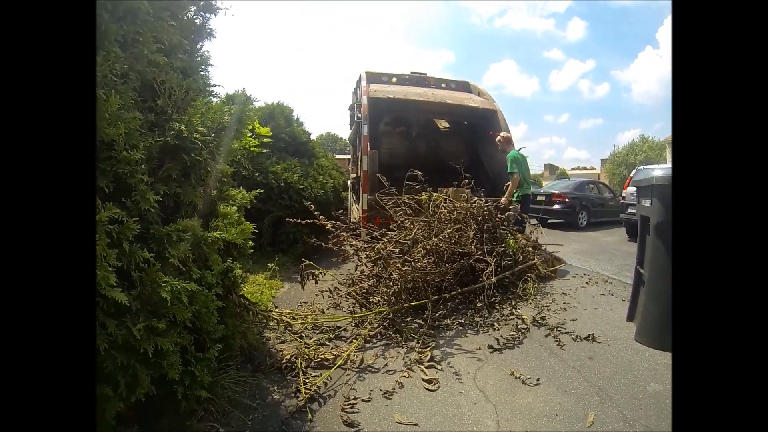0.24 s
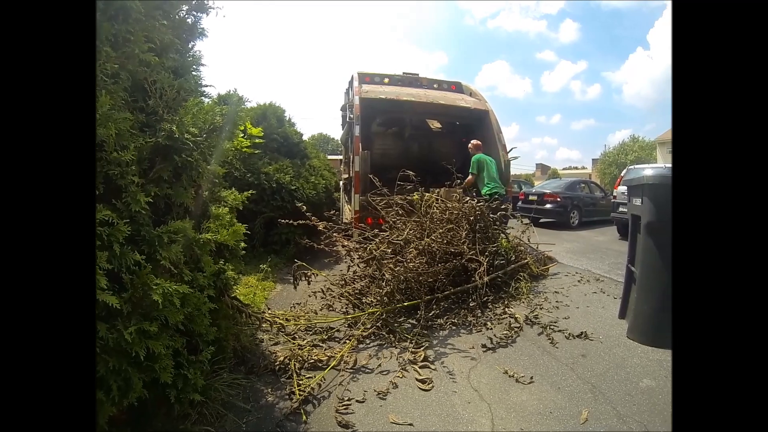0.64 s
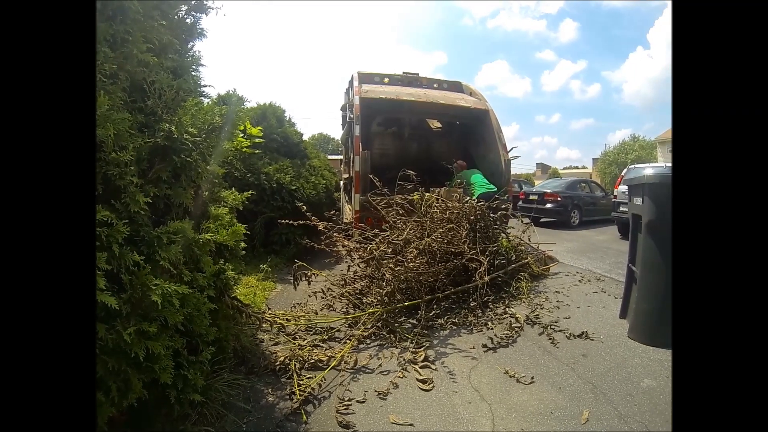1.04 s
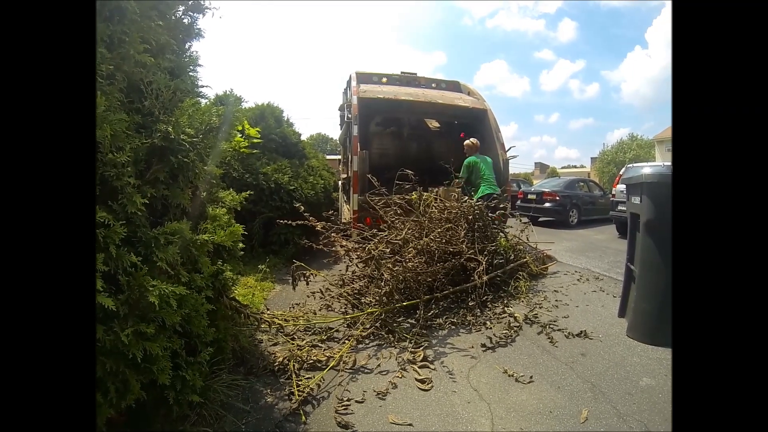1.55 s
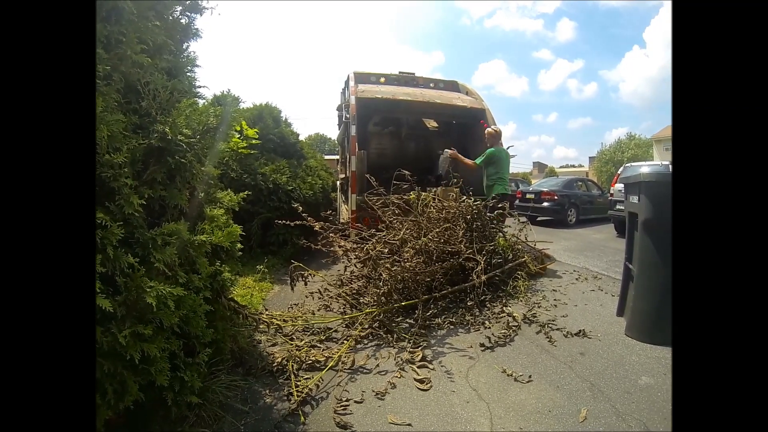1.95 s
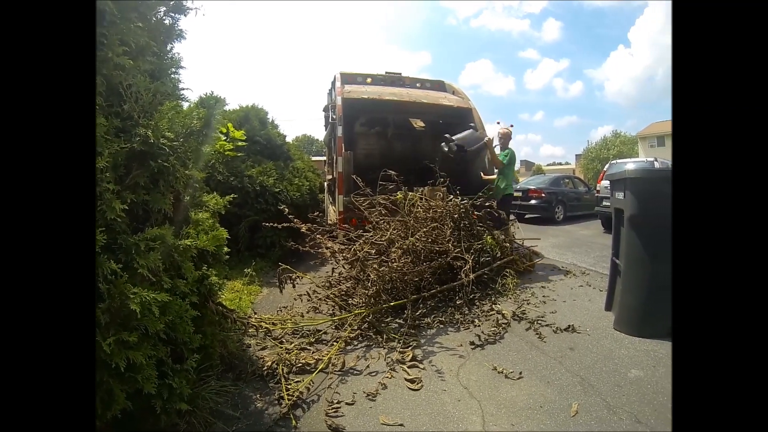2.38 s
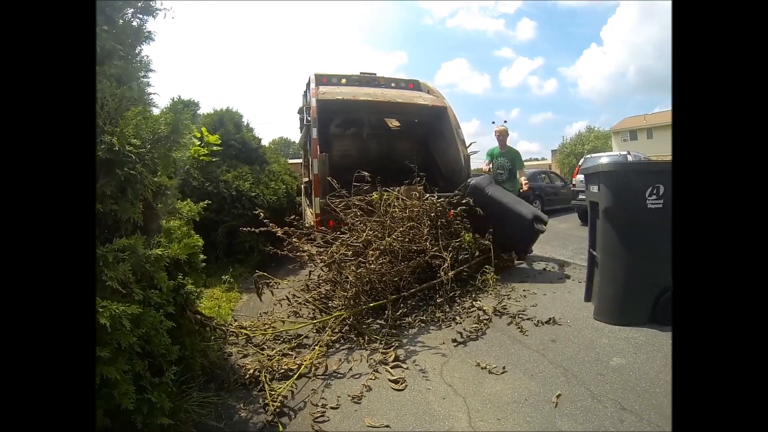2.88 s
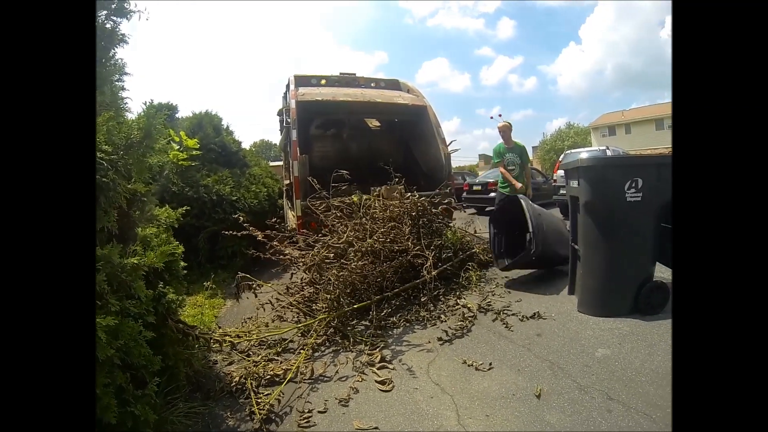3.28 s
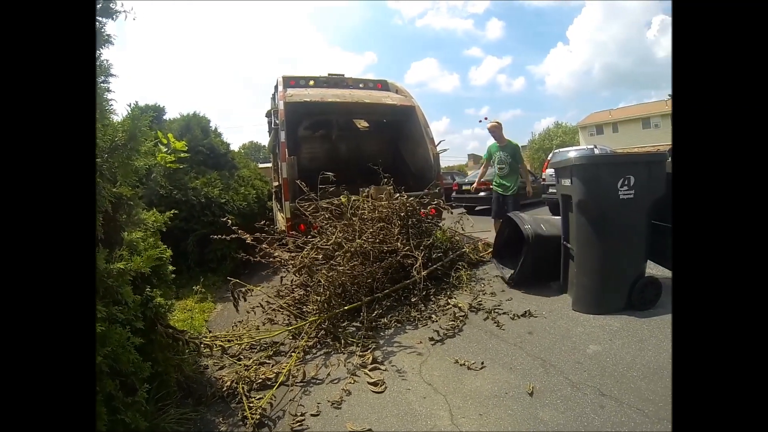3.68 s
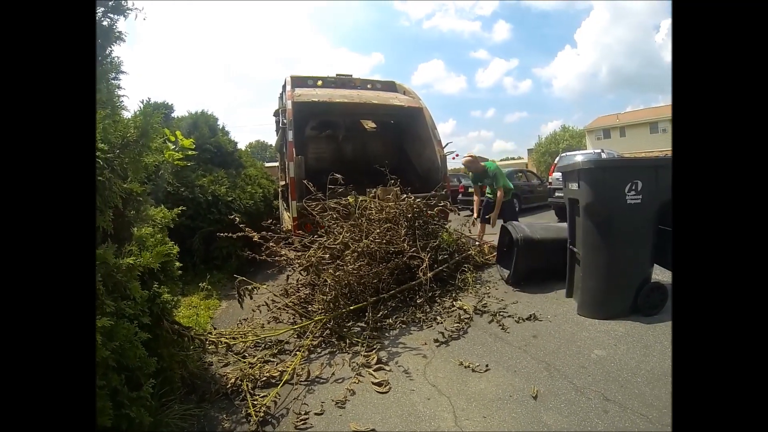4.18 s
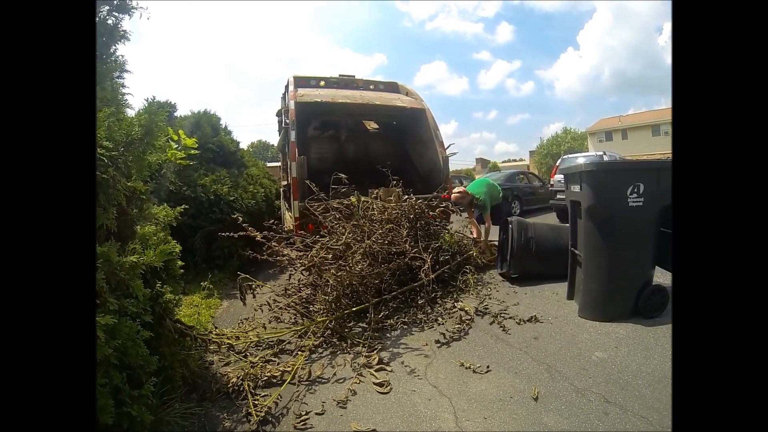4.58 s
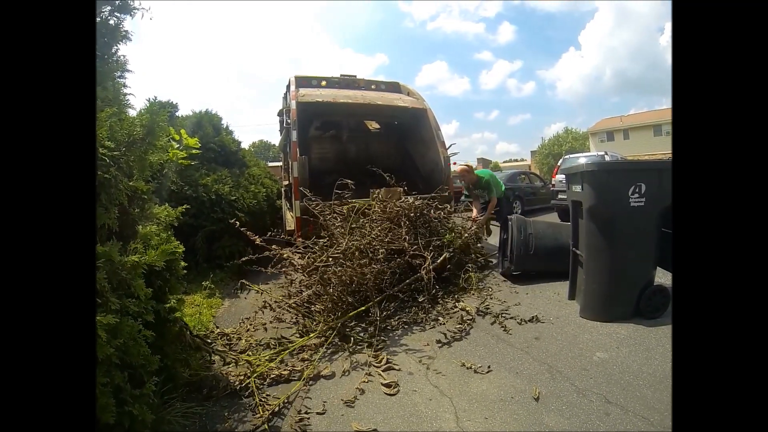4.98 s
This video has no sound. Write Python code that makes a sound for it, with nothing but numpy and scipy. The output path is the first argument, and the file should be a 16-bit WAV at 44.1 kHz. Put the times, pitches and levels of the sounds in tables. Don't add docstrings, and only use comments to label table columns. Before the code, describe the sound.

A refuse truck idles low and steady on a street. An empty plastic bin thumps and rattles in the hopper, shuffles loose, then drops with a very loud slam. The engine suddenly dips as the camera's gain ducks, the bin bounces with hollow booms and settles, the idle creeps back, and dry twigs crackle at the end.

```python
import sys
import numpy as np
from scipy import signal
from scipy.fft import rfft, irfft, next_fast_len
from scipy.io import wavfile
from scipy.ndimage import map_coordinates

SR = 44100
rng = np.random.default_rng(int(sys.argv[2]) if len(sys.argv) > 2 else 0)


def volts_from_db(level):
    exponent = np.asarray(level, float) / 20
    return 10 ** exponent


def store_pcm(level_fs):
    pcm = np.round(np.clip(level_fs, -1, 1) * 32767).astype(np.int16)
    wavfile.write(sys.argv[1], SR, np.atleast_2d(pcm).T)


N = 230728


def unit(x):
    return x / np.sqrt(np.mean(x ** 2) + 1e-20)


def fade(t, t60):
    return volts_from_db(-60 * t / t60)


def place(out, start_s, sound):
    out[round(start_s * SR):][:len(sound)] += sound


def curves(rows):
    time_s, *columns = np.transpose(rows)
    return [np.interp(np.arange(N) / SR, time_s, column) for column in columns]


def wobble(rate):
    coarse = np.arange(0, N + 32, 32)
    knots = rng.standard_normal(int(N * rate / SR) + 4)
    return np.interp(np.arange(N), coarse, map_coordinates(knots, [coarse * rate / SR]))


def coloured(x, spectrum):
    size = next_fast_len(len(x) + 8192)
    hz, db = np.transpose(spectrum)
    bins_hz = np.fft.rfftfreq(size, 1 / SR)
    gain = volts_from_db(np.interp(np.log(bins_hz + 1), np.log(hz + 1), db))
    return unit(irfft(rfft(x, size) * gain, size)[:len(x)])


def crackle(per_s, spread_db, share):
    draw = rng.random((N, 3))
    size = volts_from_db(-spread_db * np.log(draw[:, 2] + .03))
    snaps = (draw[:, 0] < per_s / SR) * np.sign(draw[:, 1] - .5) * size
    return np.sqrt(1 - share) * rng.standard_normal(N) + np.sqrt(share) * unit(snaps)


def swells(start_s, rise_s, peak_db, t60_s):
    grid = np.arange(0, N / SR + .01, .0005)
    late = grid[:, None] - start_s
    shape_db = np.where(late < 0, 20 * late / rise_s, -60 * late / t60_s)
    power = (volts_from_db(peak_db + shape_db) ** 2).sum(axis=1)
    return np.interp(np.arange(N) / SR, grid, np.sqrt(power))


# start_s,
# peak_db, snap_db, wall_hz
JOSTLES = [(.881, -22.5, -23, 1280), (.909, -22, -21.5, 855), (1.224, -18, -25.5, 1760),
           (1.251, -16, -33, 1255), (1.309, -30, -13.5, 1070), (1.384, -24.5, -23, 990),
           (1.456, -23, -18, 1320), (1.53, -23, -20.5, 825), (1.627, -26.5, -24.5, 1240),
           (1.818, -26, -21, 1050), (1.901, -23.5, -25, 1200), (2.089, -24, -20.5, 1070),
           (2.241, -28, -27, 1430), (2.679, -24.5, -12, 1970), (2.727, -17, -18, 1070),
           (2.767, -11.5, -21, 1050), (2.789, -11.5, -19.5, 1010), (4.234, -33, -21, 802),
           (4.349, -33, -21, 1050), (5.05, -26, -22, 1120)]
SLAM = (2.852, 7, -30, 1606)
BOUNCES = [(2.902, -19.5, -40, 914), (3.005, -26, -45, 810), (3.066, -32, -45, 1880),
           (3.112, -37, -12, 1990), (3.17, -38, -25, 885), (3.213, -12.5, -29, 820),
           (3.227, -10, -28, 1365), (3.277, -20.5, -38, 2050), (3.302, -14.5, -32, 970),
           (3.382, -23, -7, 1110), (3.409, -24.5, -20, 1570), (3.446, -22, -34, 960),
           (3.481, -24, -34, 991), (3.609, -25, -33, 888), (3.675, -22.5, -17, 1067),
           (3.771, -28, -21, 1070), (3.831, -24.5, -24, 975), (4.012, -24.5, -28, 1380)]
# freq_hz, level_db (per Hz)
WALL = [(200, -42), (600, -6), (1050, 0.5), (1400, -4), (1950, -2), (2400, -14.5), (3300, -20.5),
        (4500, -33), (6000, -42.5), (9000, -45.5), (20000, -72)]
# freq_hz, level_db (per Hz)
TWIGS = [(2000, -40), (4500, -7), (5500, -2.5), (6500, -8.5), (7800, -13.5), (9200, -7.5), (10300, -13.5),
         (11300, -12), (12500, -16.5), (14800, -22.5), (17000, -40.5)]


def knocks():
    out, t = np.zeros(N + SR), np.arange(SR // 4) / SR
    for contacts, t60 in [(JOSTLES, .062), ([SLAM], .022), (BOUNCES, .068)]:
        for start_s, db, snap_db, wall_hz in contacts:
            noise = rng.standard_normal((2, len(t)))
            snap_hz = 3000 * rng.normal(1, .06)
            decay = fade(t, t60)
            wall = .5 * coloured(noise[0], WALL) + .43 * np.sin(2 * np.pi * wall_hz * t)
            snap = .35 * coloured(noise[1], TWIGS) + .45 * np.sin(2 * np.pi * snap_hz * t)
            onset = 1 - np.exp(-t / .00059)
            place(out, start_s, volts_from_db(db) * decay * onset * (wall + volts_from_db(snap_db) * decay ** .4 * snap))
    return out[:N]


# start_s, peak_db, main_note_hz, t60_s
THUDS = [(0.909, -8.5, 400, 0.06), (0.919, -11, 410, 0.06), (1.251, -14, 228, 0.12),
         (1.529, -24, 455, 0.08), (2.764, -13, 246, 0.14), (2.789, -13, 231, 0.12), (2.906, -17, 303, 0.12),
         (2.93, -18, 229, 0.21), (3.005, -20.5, 237, 0.12), (3.207, -5, 286, 0.1),
         (3.2275, -11.5, 291, 0.14), (3.302, -15, 417, 0.098), (3.413, -14, 272, 0.075),
         (3.481, -17, 267, 0.095), (3.676, -22.5, 291, 0.12), (3.83, -32, 280, 0.12),
         (4.014, -22, 303, 0.12), (5.198, -19, 310, 0.12)]
BUMPS = [
    (2.789, -17, 188, .15),
    (2.93, -16, 148, .2),
    (2.99, -23, 145, .25),
    (3.227, -15.5, 163, .13),
    (3.36, -20, 125, .25),
]
RAPS = [
    (1.263, -21, 476, .06),
    (2.852, -16, 500, .05),
    (3.112, -29, 1990, .045),
    (2.241, -26, 1450, .08),
    (3.213, -8, 624, .06),
    (4.014, -26, 600, .06),
]
# freq_hz, level_db, t60_s
BIN = [(161, 3.5, 0.21), (243, -10.5, 0.12), (291, -1.5, 0.17), (407.4, -2, 0.12), (480, -4, 0.12),
       (624, -3.5, 0.074)]


def thuds():
    out, t = np.zeros(N + SR), np.arange(SR // 3) / SR
    for start_s, db, hz, t60 in [*THUDS, *BUMPS, *RAPS]:
        lead = fade(t, t60) * np.sin(2 * np.pi * hz * t)
        rest = np.zeros(len(t))
        for mode_hz, mode_db, mode_t60 in BIN:
            level = volts_from_db(mode_db + rng.normal(0, 2.2))
            rest += level * fade(t, mode_t60) * np.sin(2 * np.pi * mode_hz * t)
        onset = 1 - np.exp(-t * hz / 1.1)
        place(out, start_s, volts_from_db(db - 1.5) * (lead + volts_from_db(-14.5) * rest) * onset)
    return out[:N]


# start_s, peak_db, centre_hz
CRACKS = [
    (2.8524, -19.5, 3660),
    (3.3827, -25, 4710),
    (3.4094, -39, 3500),
    (3.6102, -36, 3900),
    (3.6706, -35, 4220),
    (3.7713, -38, 3640),
    (3.8322, -43, 4000),
]


def cracks():
    out, t = np.zeros(N + SR), np.arange(SR // 10) / SR
    for start_s, db, hz in CRACKS:
        band = [(hz / 4, -30), (hz / 1.5, -5), (hz, 0), (hz * 1.5, -8), (hz * 3, -22)]
        burst = coloured(rng.standard_normal(len(t)), band)
        place(out, start_s, volts_from_db(db - 6.5) * fade(t, .02) * burst)
    return out[:N]


# start_s, peak_db, upper_note_db
CLINKS = [
    (1.2514, -38, -15),
    (1.3124, -38, -14),
    (1.3843, -41, -15),
    (1.4574, -34, -19),
    (1.5459, -36, -16),
]
# low_hz, high_hz
RING_HZ = (3120, 5350)


def clinks():
    out, t = np.zeros(N + SR), np.arange(SR // 5) / SR
    for start_s, db, upper_db in CLINKS:
        roughness = np.cumsum(rng.normal(0, .09, (2, len(t))), axis=1)
        notes_hz = np.array(RING_HZ) * rng.normal(1, .02, 2)
        low, high = np.sin(2 * np.pi * np.outer(notes_hz, t) + roughness)
        shape = fade(t, .07) * (1 - np.exp(-t / .004))
        place(out, start_s, volts_from_db(db + 1.5) * shape * (low + volts_from_db(upper_db + 4) * high))
    return out[:N]


# time_s, wall_db
SHUFFLE = [
    (1.3, -70),
    (1.39, -43),
    (1.87, -36),
    (2.35, -41),
    (2.42, -75),
]
# peak_s, rise_s (per 20 dB, before the peak), wall_db, boom_db, t60_s
SLIDES = [(.9, .05, -28, -22, .2), (1.226, .012, -31, -23, .2), (1.275, .12, -25, -29, .15),
          (1.63, .3, -33, -33, .1), (2.754, .14, -24.5, -30, .3), (2.768, .02, -16.5, -10.5, .35),
          (2.84, .06, -17, -12, .02), (2.854, .003, -9, -16, .06), (2.917, .1, -27, -17, .35),
          (3.085, .4, -37, -33, .45), (3.211, .008, -22.5, -11, .35), (3.309, .12, -29, -24, .5),
          (3.41, .05, -32, -25, .6), (3.5, .15, -33, -25, .3), (3.615, .008, -32, -31.5, .6),
          (3.694, .15, -33, -29.5, .3), (3.834, .01, -37, -38, .5), (4.012, .01, -36.5, -30, .2)]
# freq_hz, level_db (per Hz)
BOOM = [(65, -35.5), (110, -11), (168, -2.5), (203, -11.5), (221, -9.5), (291, -2.5), (335, -16.5),
        (405, -13), (800, -21.5), (1040, -58), (1760, -120)]


def drag():
    start_s, rise_s, wall_db, boom_db, t60_s = np.transpose(SLIDES)
    shuffle = volts_from_db(curves(SHUFFLE)[0])
    wall_gain = shuffle + swells(start_s, rise_s, wall_db, t60_s)
    boom_gain = shuffle * volts_from_db(2) + swells(start_s, rise_s, boom_db, t60_s)
    chatter = coloured(crackle(900, spread_db=3, share=.2), WALL)
    rumble = coloured(rng.standard_normal(N), BOOM)
    wall = wall_gain * volts_from_db(-3.3 + 1.6 * wobble(60)) * chatter
    return wall + boom_gain * volts_from_db(-2.2 + .99 * wobble(30)) * rumble


# time_s, twigs_db
HAUL = [(0, -72), (.7, -72), (1.3, -69), (1.5, -66), (1.8, -62), (1.9, -66), (2.55, -68), (2.66, -63),
        (2.72, -52), (2.85, -42), (2.87, -68), (3.0, -80), (4.05, -82), (4.25, -69), (4.47, -64),
        (4.67, -51), (5.03, -49.5), (5.23, -43)]
# peak_s, rise_s (per 20 dB, before the peak), peak_db, leaves_db (over the twigs)
SWISHES = [(.3, .2, -71, 15), (.95, .2, -66, 8), (1.47, .06, -66, 18), (1.55, .08, -66, 22),
           (1.63, .15, -60, 1), (1.845, .08, -58, -2), (2.09, .15, -70, 22), (2.22, .1, -59, 4),
           (2.36, .08, -64, 10), (2.49, .2, -62, 9), (2.62, .08, -59, 7), (3.125, .03, -61, 2),
           (3.18, .06, -62, 6), (3.305, .05, -58, 18), (3.695, .12, -57, 9), (4.385, .06, -61, 2),
           (5.12, .15, -54, 18)]
# freq_hz, level_db (per Hz)
LEAVES = [(250, -33), (700, -4.5), (1100, -0.5), (1500, 0), (2000, -1), (2400, -5.5), (3200, -4),
          (4200, -12), (5500, -28), (9000, -50), (20000, -90.5)]


def brush():
    stir = volts_from_db(curves(HAUL)[0])
    start_s, rise_s, db, leaves_db = np.transpose(SWISHES)
    hit_s, hit_db, snap_db, _ = np.transpose(BOUNCES)
    grit = swells(hit_s, .004, hit_db + snap_db - 17, .15)
    litter = swells(hit_s, .004, hit_db + .6 * snap_db - 8, .15)
    twig_gain = np.hypot(stir, swells(start_s, rise_s, db, .2)) + grit
    leaf_gain = np.hypot(stir * volts_from_db(13), swells(start_s, rise_s, db + leaves_db, .2)) + litter
    clumps = 1.4 * wobble(25) + 1.2 * wobble(70)
    source = crackle(2500, spread_db=3, share=.25)
    twigs = twig_gain * volts_from_db(3 + clumps) * coloured(source, TWIGS)
    leaves = leaf_gain * volts_from_db(2 + .6 * clumps + 1.6 * wobble(14)) * coloured(source, LEAVES)
    return twigs + leaves


def street(x):
    t = np.arange(SR // 3) / SR
    tail = coloured(rng.standard_normal(len(t)), [(100, 5.5), (2000, -5.5), (8000, -11.5)])
    tail *= fade(t, .083)
    delayed = np.pad(x, (500, 0))
    return signal.fftconvolve(delayed, tail / np.linalg.norm(tail))[:N]


# time_s, firing_hz
SPEED = [(0, 33.31), (1.3, 33.2), (2.6, 33.18), (3.9, 33.28), (5.23, 33.14)]
# multiple (of the firing rate), level_db (rms)
EXHAUST = [(1, -23), (1.5, -48.5), (2, -21.5), (2.5, -42), (3, -19), (3.5, -55.5), (4, -37), (5, -55),
           (6, -22), (7, -45), (9, -41), (10, -49.5), (12, -44)]
# freq_hz, level_db (per Hz)
BLOCK = [(12, -25), (48, -1), (80, -5), (125, -0.5), (165, -6), (290, -9), (400, -15), (680, -25.5),
         (1030, -20), (1950, -29), (2400, -36.5), (4000, -44), (8000, -63), (15500, -83)]


def engine():
    turn = 2 * np.pi * np.cumsum(curves(SPEED)[0]) / SR
    pulses = np.zeros(N)
    for k, db in EXHAUST:
        lag = .85 * np.sqrt(k) * (k % 2 == 0)
        level = np.sqrt(2) * volts_from_db(db + .6 * wobble(9.2))
        pulses += level * np.cos(k * turn - lag + .2 * wobble(5))
    beat = volts_from_db(.87 * np.cos(turn + 2.7) + .38 * wobble(10) + 1.2 * wobble(1.8))
    rattle = coloured(crackle(900, spread_db=3, share=.15), BLOCK)
    return pulses + volts_from_db(-26) * beat * rattle


# freq_hz, level_db
WHINE = [(6452, -61), (12885, -71)]


def whine():
    t = np.arange(N) / SR
    gate = np.clip(.3 + np.cos(2 * np.pi * 47.95 * t + .9), 0, 1) * volts_from_db(1.5 * wobble(30))
    return gate * sum(volts_from_db(db) * np.sin(2 * np.pi * hz * t) for hz, db in WHINE)


def camera_gain():
    rest_db, duck_s, duck_db, hold_s, creep_db_per_s = .2, 2.844, -14.5, .4, 11
    late = np.arange(N) / SR - duck_s
    back_db = np.minimum(duck_db + creep_db_per_s * np.maximum(late - hold_s, 0), 0)
    return volts_from_db(rest_db + back_db * np.clip(late / .003, 0, 1))


# time_s, gain_db
HUSH = [
    (2.843, 0),
    (2.846, -15),
    (2.849, -15),
    (2.851, 0),
]


def scene():
    blows = knocks() + thuds() + clinks() + cracks()
    near = blows + drag() + brush() + volts_from_db(-11) * street(blows)
    steady = camera_gain() * (engine() + whine())
    return volts_from_db(curves(HUSH)[0]) * (near + steady)[None]


def roll_off(x):
    return signal.sosfilt(signal.butter(12, 15200, fs=SR, output="sos"), x)


# centre_hz, width_hz, level_db
HOUSING = [(820, 200, -2), (2700, 600, -2.5), (3600, 700, 1), (4700, 500, -1), (5450, 500, 1.5),
           (6100, 500, -2), (9300, 2500, -1)]


def record(dry):
    size = next_fast_len(N + 8192)
    hz = np.fft.rfftfreq(size, 1 / SR)
    case_db = sum(db * np.exp(-2 * ((hz - centre) / width) ** 2) for centre, width, db in HOUSING)
    boxed = irfft(rfft(dry, size) * volts_from_db(case_db), size)[:, :N]
    start = np.minimum(np.arange(N) / (.003 * SR), 1)
    rounded = start * boxed / (1 + np.abs(boxed) ** 12) ** (1 / 12)
    return roll_off(rounded)


dry = scene()
out = record(dry)
store_pcm(out)
```